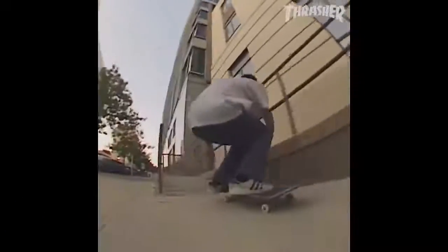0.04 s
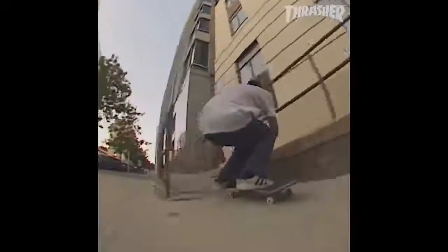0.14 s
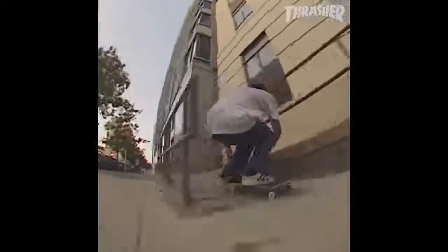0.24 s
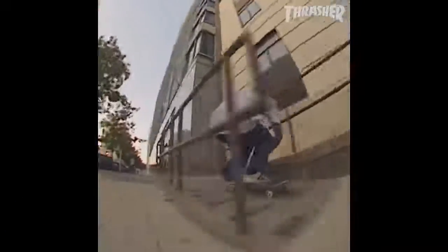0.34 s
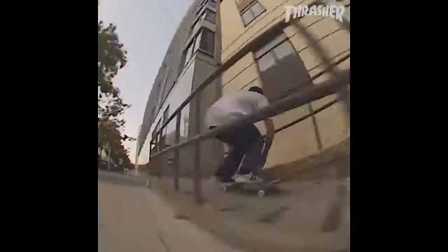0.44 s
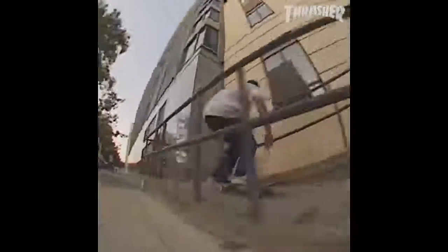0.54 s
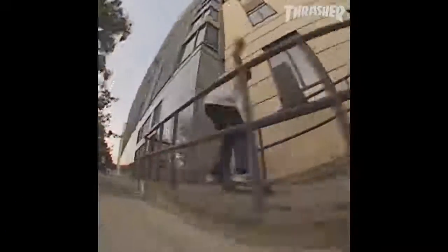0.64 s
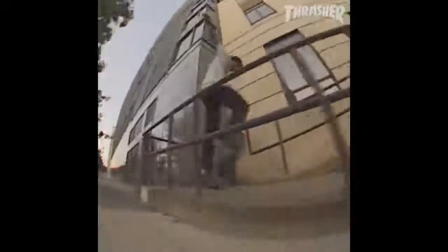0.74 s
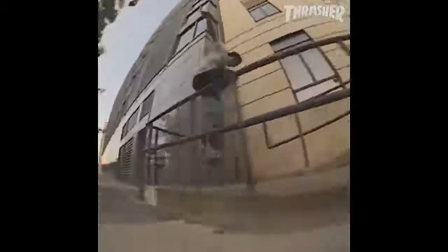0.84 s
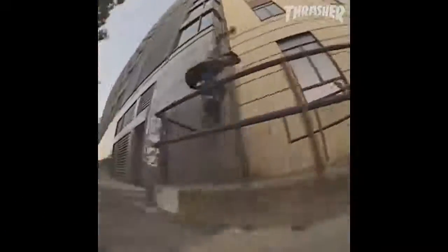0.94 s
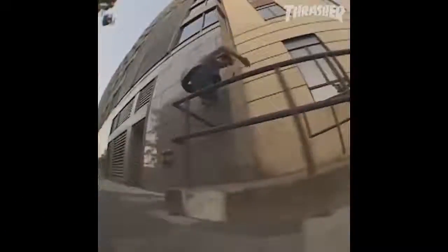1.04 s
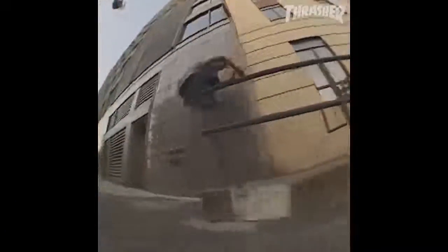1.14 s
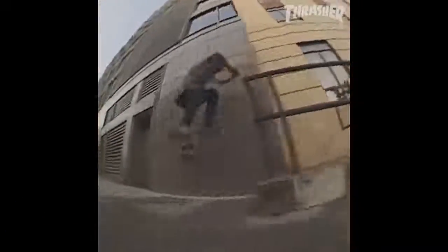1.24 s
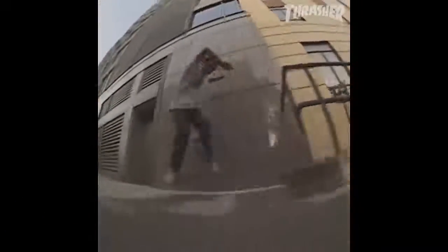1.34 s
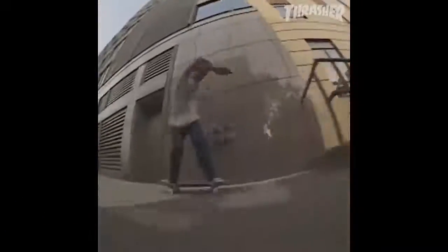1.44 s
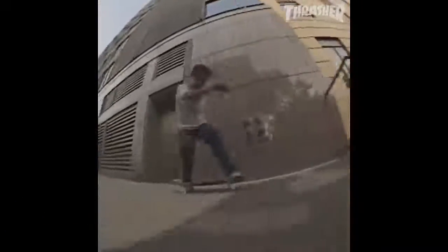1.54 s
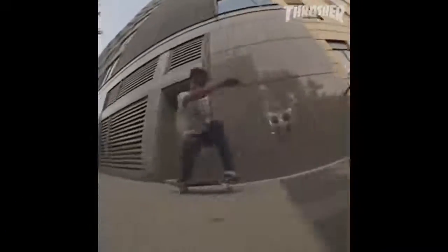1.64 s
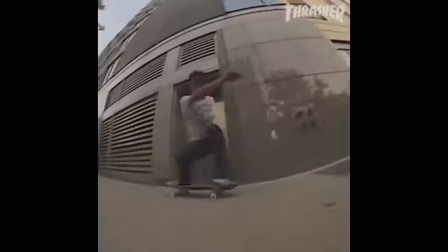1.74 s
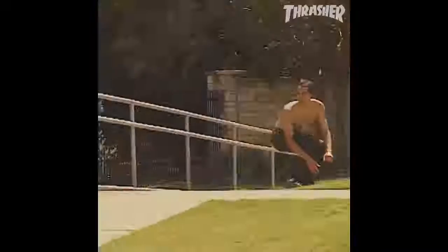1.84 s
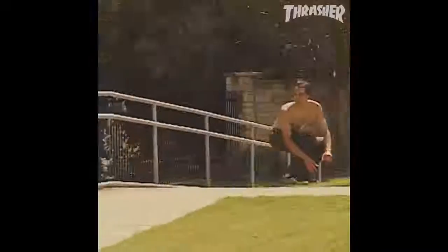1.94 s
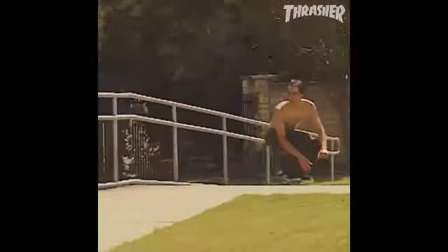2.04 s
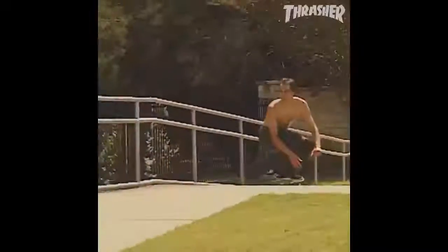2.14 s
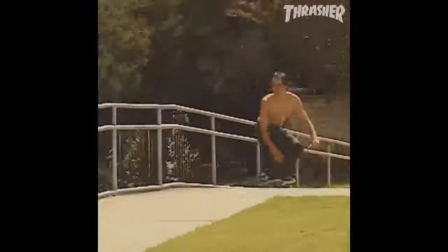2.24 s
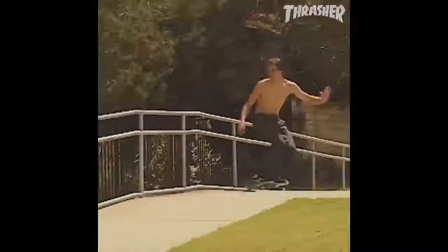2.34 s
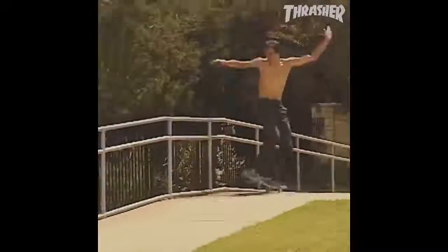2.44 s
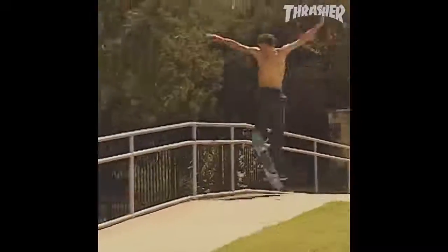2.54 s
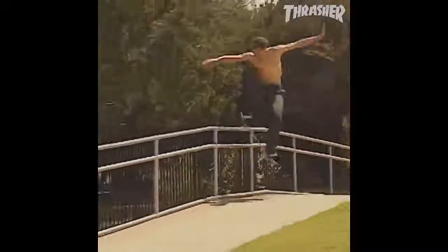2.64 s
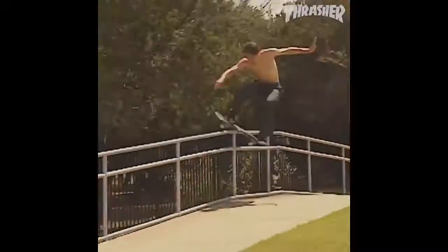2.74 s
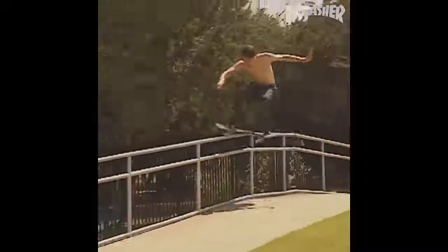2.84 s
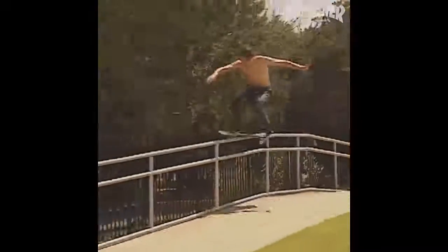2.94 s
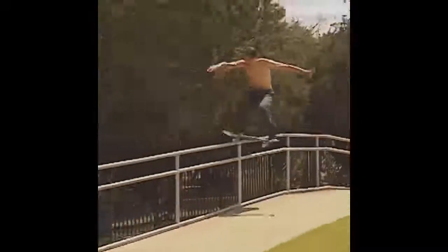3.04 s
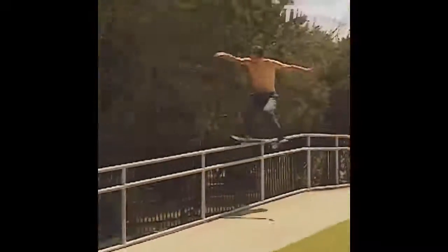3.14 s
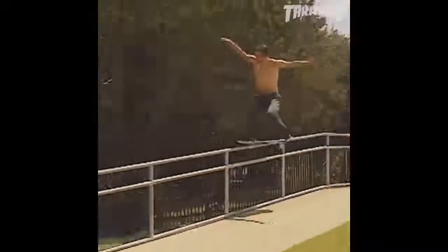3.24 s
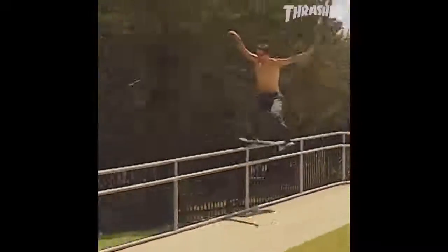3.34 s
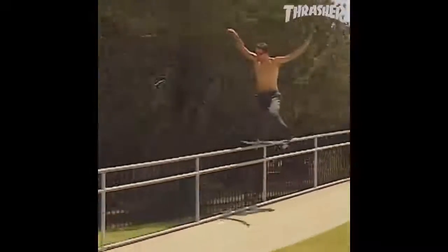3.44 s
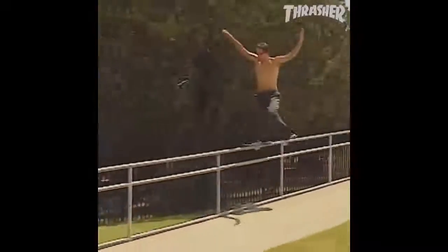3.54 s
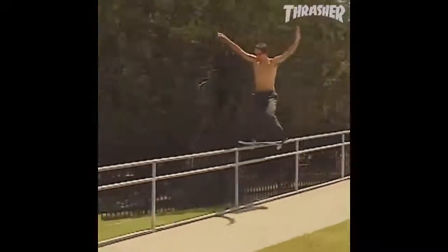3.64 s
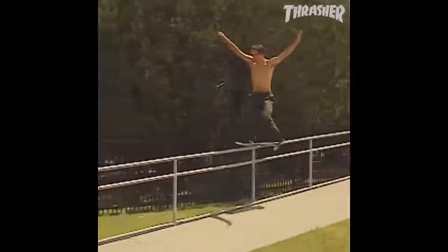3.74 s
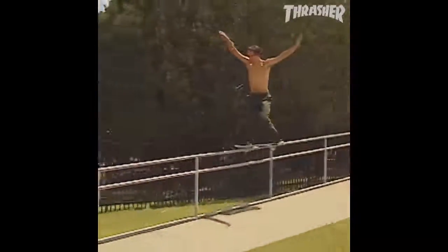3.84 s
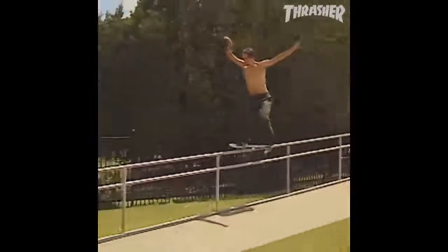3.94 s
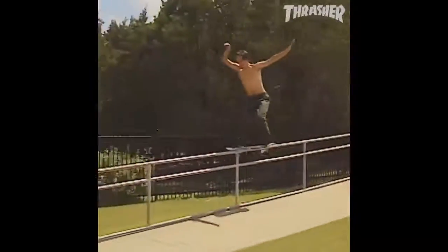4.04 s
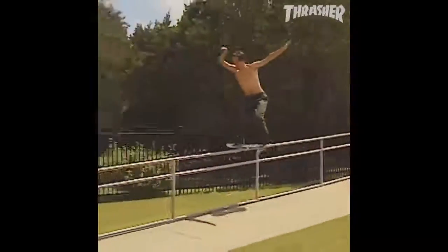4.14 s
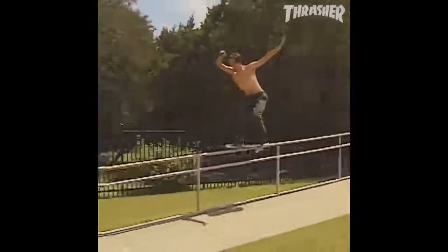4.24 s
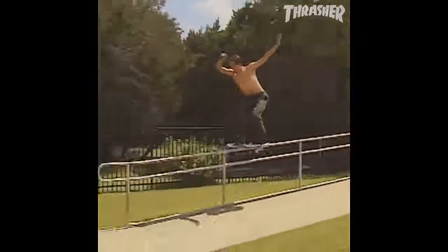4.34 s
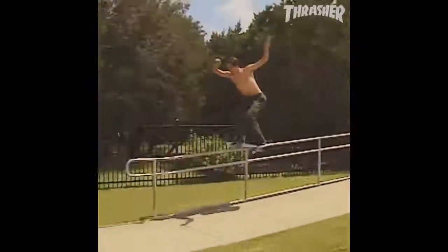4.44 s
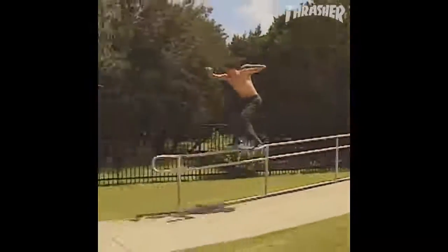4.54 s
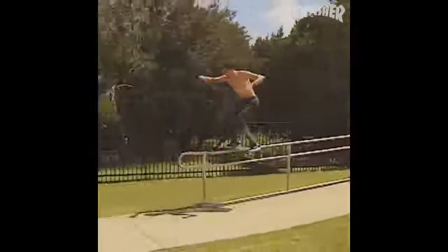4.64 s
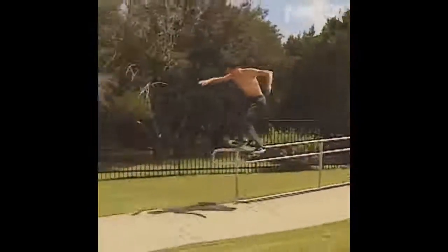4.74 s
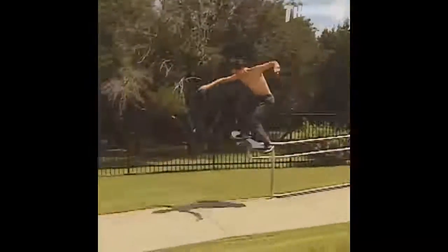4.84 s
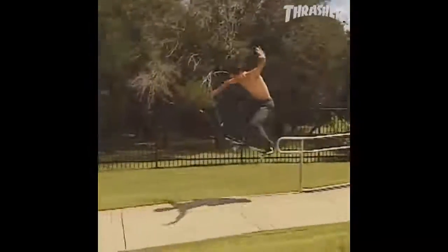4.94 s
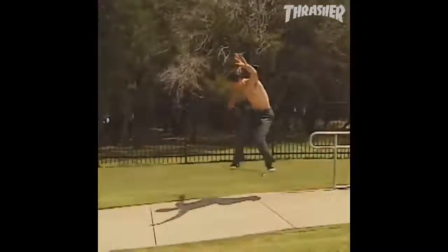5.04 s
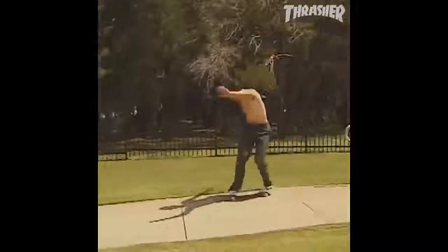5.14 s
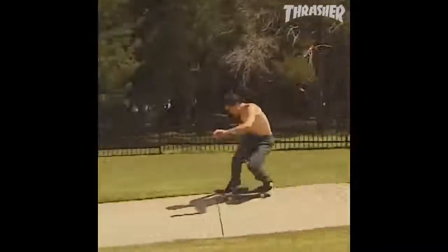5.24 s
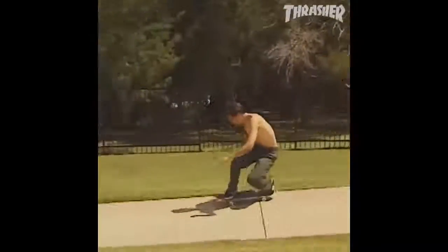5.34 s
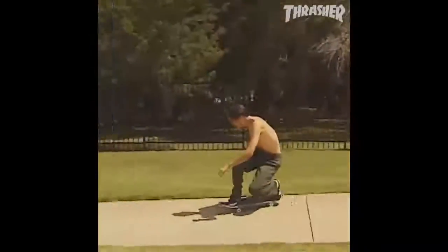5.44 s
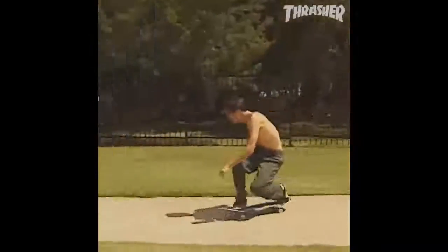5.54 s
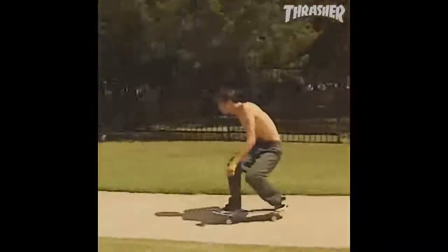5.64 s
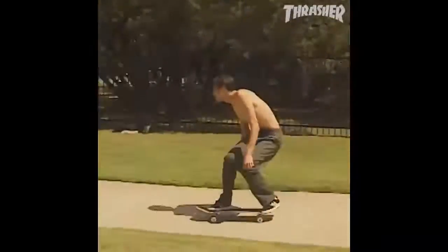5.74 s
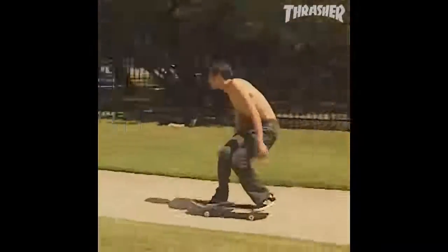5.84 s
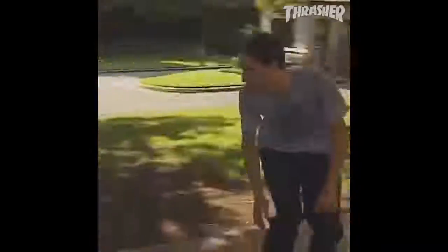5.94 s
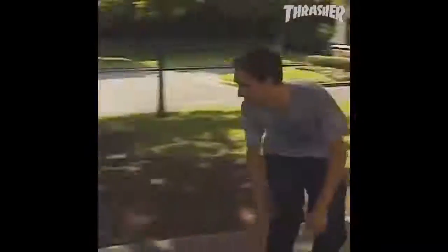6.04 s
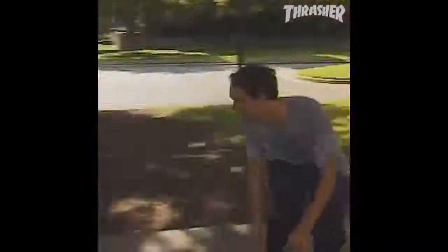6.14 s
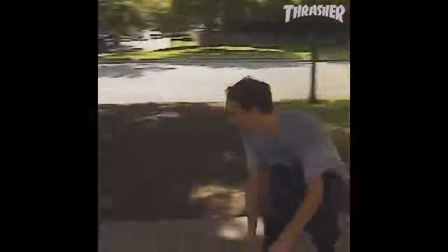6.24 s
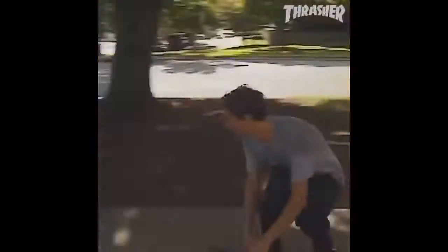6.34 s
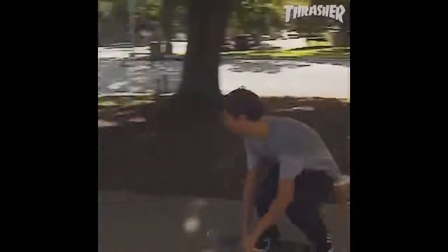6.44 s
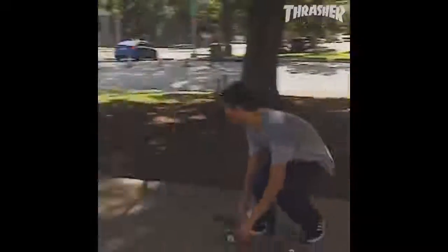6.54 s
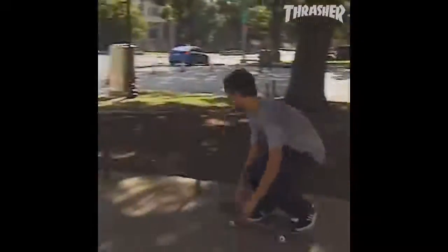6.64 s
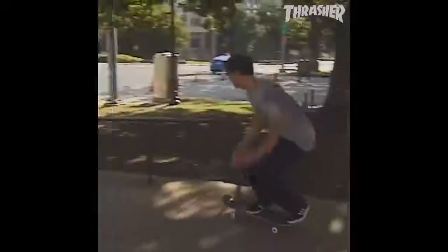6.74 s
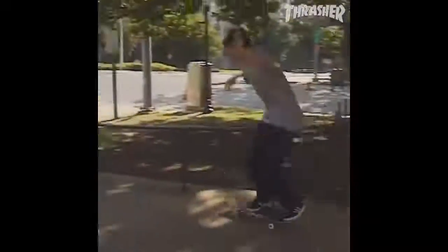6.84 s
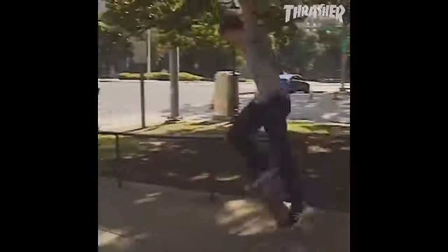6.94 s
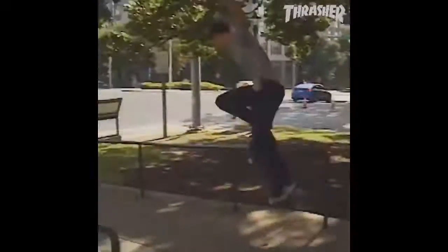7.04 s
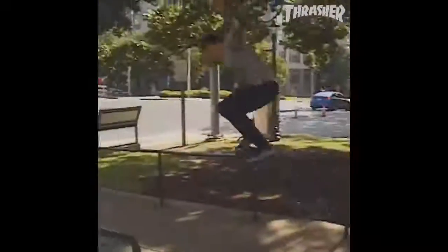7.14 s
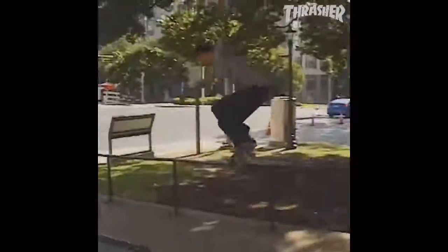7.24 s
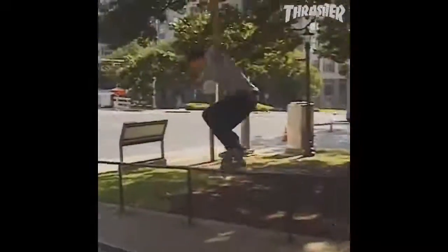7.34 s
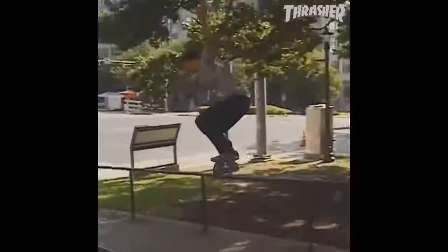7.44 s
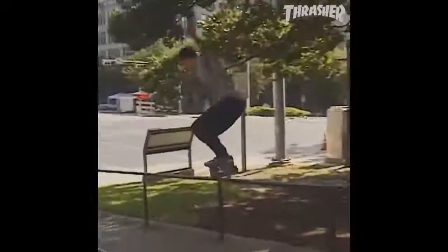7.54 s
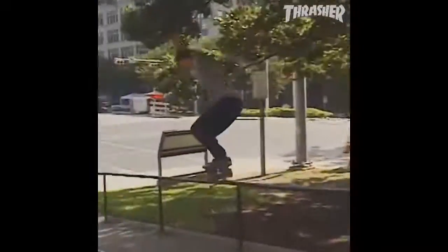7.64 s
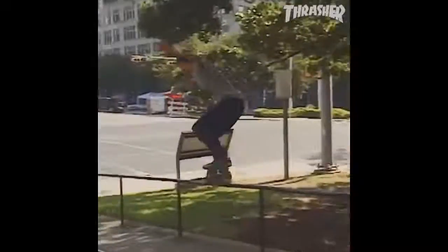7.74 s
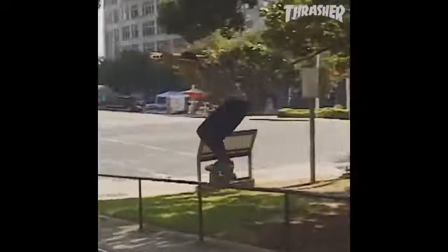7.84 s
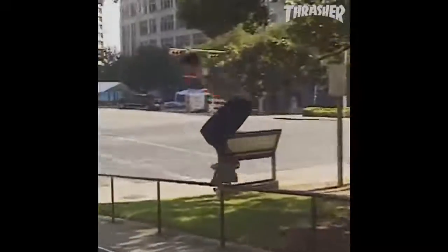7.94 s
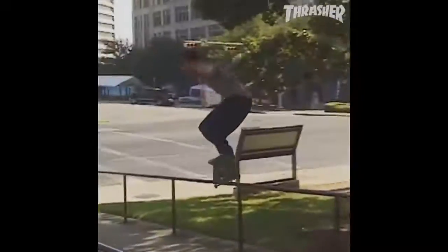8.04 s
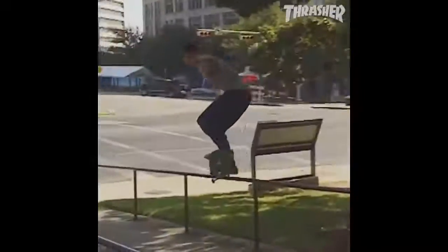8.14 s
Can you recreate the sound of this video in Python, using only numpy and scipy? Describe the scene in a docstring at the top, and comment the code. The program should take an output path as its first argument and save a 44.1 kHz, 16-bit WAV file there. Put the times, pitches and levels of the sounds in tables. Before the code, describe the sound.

A skateboard rolls over rough pavement, pops, hums dully along a wall and lands with a hard slap. A second rolls up a path with paired knocks, snaps, slides softly along a long metal rail among windy rumbles, and slams down. A third roars past close, pops and grinds steel until the end. Short street echo; the middle is stereo, the outer parts mono.

```python
"""Wheels roar over paving and knock across joints, tails snap and boards land hard in three skateboard tricks outdoors.
One board slides softly down a long handrail, the last grinds a ringing steel rail; air buffets the microphone.
Rolling and scraping are random grains that excite a resonant body; blows are short chatters of such grains.
Wind and open air are coloured noise, street echoes are sparse reflections, and the hardest blows overload the input."""
import sys
import numpy as np
from scipy import signal
from scipy.io import wavfile
from scipy.ndimage import map_coordinates

SR = 44100
rng = np.random.default_rng(int(sys.argv[2]) if len(sys.argv) > 2 else 0)


def transcribe(signal):
    """Save signal, clipped to [-1, 1], as a 16-bit WAV file at the path in sys.argv[1]."""
    frames = np.atleast_2d(signal).T
    limited = np.clip(frames, -1, 1)
    pcm = np.round(limited * 32767).astype(np.int16)
    wavfile.write(sys.argv[1], SR, pcm)


N = 361179
TIME = np.arange(N) / SR

# rides over the path: on_s, off_s, roar_db, hiss_db, roar_trend_db_per_s, hiss_trend_db_per_s,
# surge_db (at touchdown), release_t60_s
PATH_RIDE = (5.11, 6, -31, -36.5, 6.5, 0.5, -2, 0.12)
PARK_RIDE = (5.86, 6.925, -16.2, -35.3, -10, -3.3, -2.5, 0.44)
# colour of a wheel knock: pitch_hz, level_db (relative, per hertz)
KNOCK_COLOUR = [(60, -26.5), (200, -3), (680, 3), (1270, -17.5), (2120, -23), (3320, -18.5), (4250, -26.5),
                (12800, -35)]
# resonances of wheels, trucks and handrail: pitch_hz, half_width_hz, level_db (relative)
WHEEL_MODES = [(325, 49, -7), (610, 40, -10), (1151, 200, -13)]
TRUCK_MODES = [(600, 40, 15), (1500, 40, 3)]
HANDRAIL_MODES = [(1430, 70, 5), (1820, 55, -1), (2580, 60, 0), (3000, 90, 1), (3840, 60, -3),
                  (5950, 150, -10)]


def rolling():
    """Rolling noise: surface roughness excites hard wheels, coloured by each kind of paving."""
    # unbroken rides: on_s, off_s, roar_db, hiss_db, roar_trend_db_per_s, hiss_trend_db_per_s,
    # surge_db, release_t60_s
    sidewalk_ride = (0.0, 0.3185, -19.5, -36, -25.5, 4.5, 1.5, 0.1868)
    concrete_ride = (0.31, 1.385, -36.8, -44.3, 1, 3.5, 4, 0.03)
    roll_away_ride = (1.39, 1.815, -28.5, -40, 1, 0, 0, 0.03)
    ramp_ride = (1.82, 2.5, -32.5, -53, -0.5, 10, -2.5, 0.3051)
    # colour of each surface: pitch_hz, level_db (relative, per hertz)
    sidewalk_colour = [(90, -6), (180, -13), (450, -0.5), (950, -2.5), (1460, -12), (3480, -17.5),
                       (4450, -28), (7400, -24.5), (12800, -30.5)]
    concrete_colour = [(100, 0), (400, -1), (800, 0), (950, -4), (1300, -3), (1570, 3.5), (1950, -4),
                       (3300, -13), (4400, -24), (7300, -27), (10000, -24), (12800, -35)]
    roll_away_colour = [(130, 3), (440, -1), (620, 1), (950, -6), (1300, -3), (2000, -10), (3400, -14),
                        (4300, -23), (9000, -24), (12800, -34)]
    ramp_colour = [(100, -15), (480, -4), (1300, -19.5), (1820, -32), (12800, -44.5)]
    path_colour = [(80, -4), (200, 1), (330, 5), (450, 3), (650, 6.5), (860, -2.5), (1150, -1.5),
                   (1930, -22.5), (5000, -29.5), (9500, -29.5), (12800, -42)]

    sidewalk = contact(sidewalk_ride, body(sidewalk_colour, WHEEL_MODES, -3), 4000, 1.4, 1.1, 1.8, burr_db=-6)
    concrete = contact(concrete_ride, body(concrete_colour, TRUCK_MODES, -9), 8000, 2, 1.2, 1.5, burr_db=-13)
    roll_away = contact(roll_away_ride, body(roll_away_colour), 6000, 2, 1.3, 2.5, burr_db=-10)
    ramp = contact(ramp_ride, body(ramp_colour), 5000, 1.56, 1.16, 2.5, burr_db=-12)
    path = sum(contact(run, body(path_colour, WHEEL_MODES, 0), 2200, 2.3, 1.3, 1.8, burr_db=-8)
               for run in (PATH_RIDE, PARK_RIDE))
    return sidewalk + concrete + roll_away + ramp + path


def rails():
    """Friction excitation: a dry scrape along the handrail, then a metal truck that makes a steel tube sing."""
    # the two rides: on_s, off_s, roar_db, hiss_db, roar_trend_db_per_s, hiss_trend_db_per_s,
    # surge_db, release_t60_s
    slide_ride = (2.73, 4.818, -50.8, -53, 2.6, 3.6, 9, 0.12)
    grind_ride = (7.14, 9, -29.5, -32, -8.5, -5, 7, 0.03)
    # colour of each scrape: pitch_hz, level_db (relative, per hertz)
    slide_colour = [(210, -3), (450, -4), (650, -10), (1700, -13), (3700, -7.5), (4600, -15), (6000, -14),
                    (8600, -17.5), (12800, -35)]
    grind_colour = [(120, -8), (400, -8), (620, -2), (1030, 3.5), (1530, -1), (2900, -10), (3400, -7),
                    (4400, -13), (5300, -21), (6400, -10), (9000, -11), (10200, -22), (12800, -32)]

    scrape = contact(slide_ride, body(slide_colour, HANDRAIL_MODES, -17), 1500, 1.5, 2.3, 3.2,
                     burr_db=-6, width_hz=260, life_s=0.045)
    grinding = contact(grind_ride, body(grind_colour, rail_modes(), 3.8), 2000, 1.6, 1.5, 3.3,
                       burr_db=-7, width_hz=55, life_s=0.07)
    return scrape + grinding


def rail_modes():
    """Modal damping: all modes of the steel tube share one width, so they die at about the same rate."""
    # modes of the steel tube: pitch_hz, level_db (relative)
    tube_modes = [(1040, 1), (1305, -5), (1820, -6), (2073, -8), (2444, -7), (3170, -6), (3408, -5),
                  (4274, -8.5), (6363, -11), (6643, -10), (7140, -8), (7515, -7), (8150, -6)]
    half_width_hz = 42
    return [(hz, half_width_hz, db) for hz, db in tube_modes]


def impacts():
    """Impact excitation: joints knock wheels, snaps crack the maple deck, trucks ring rails, landings slam."""
    # blow tables below: start_s, chatter_s, level_db (before weighting by chatter length),
    # thump_db and crack_db (both re level)
    # short wheel bumps, a rattle after the first landing, and a wheel touching before the grind
    bumps = [(0.1895, 0.002, -4.5, -3, -21), (0.252, 0.0062, -18.5, -4.5, -20),
             (1.429, 0.045, -19, -9.5, -16), (1.515, 0.0133, -30, 10, -10), (1.62, 0.015, -27, 3, -9),
             (1.694, 0.011, -9, -6, -14), (5.535, 0.014, -25, 3, -12), (5.61, 0.005, -26, 11, -5.5),
             (5.906, 0.0061, -9.5, -6, -14.5), (6.001, 0.005, -16, 0, -11), (7.116, 0.0269, -19, -4, -11)]
    # wheels knocking on the wall make the trucks hum
    wall_touches = [(1.064, 0.06, -26, -6, -15), (1.203, 0.022, -21.5, -3, -16),
                    (1.305, 0.03, -24.5, 1, -14)]
    # tail snapping on the ground, deck clattering, shoe catching it
    clacks = [(0.7475, 0.00535, -9.5, -31, 5), (2.483, 0.0033, -12, -10, 4.5),
              (2.49, 0.008, -24, -11.5, 6.5), (6.916, 0.0038, -9.5, -7, 4.5), (7.028, 0.0033, -33, -6.5, 2)]
    # the board clanking on the long handrail
    handrail_knocks = [(2.712, 0.011, -30, -10, -6), (2.7272, 0.0036, -12, -8, 2),
                       (3.818, 0.0073, -35, -7.5, -4), (4.447, 0.0144, -33, -10, -11),
                       (4.712, 0.005, -20.5, -12, 1), (4.772, 0.0063, -23, -7, 0)]
    # the metal truck striking the steel rail
    strikes = [(7.145, 0.015, -11, -23.5, 1), (7.167, 0.00377, -9.5, -20, 4.5),
               (8.013, 0.014, -16.5, -15, -10)]
    # board and rider coming down
    landings = [(1.380, 0.026, -0.5, -8, -3.5), (5.0915, 0.013, 1.5, -9, 0)]
    # colour of snaps and of landings: pitch_hz, level_db (relative, per hertz)
    clack_colour = [(100, -3), (1050, 2), (3210, -1), (5670, -18), (7240, -17.5), (12800, -28)]
    landing_colour = [(60, -24.5), (110, 7), (480, 4.5), (1480, -4), (2100, -9), (3320, -13),
                      (12800, -33.5)]
    # resonances of the free and the loaded deck: pitch_hz, half_width_hz, level_db (relative)
    deck_modes = [(1875, 78.5, 6), (2760, 49, -7), (3344, 64, 0), (3730, 77, -3.5)]
    loaded_deck_modes = [(630, 80, 9), (1010, 75, 6), (1480, 90, 2), (3330, 280, -11)]

    wheel = body(KNOCK_COLOUR, WHEEL_MODES, 7.9)
    trucks = body(KNOCK_COLOUR, TRUCK_MODES)
    deck = body(clack_colour, deck_modes, 2.5)
    handrail = body(landing_colour, HANDRAIL_MODES, -1.5)
    steel_rail = body(clack_colour, rail_modes(), 2.7)
    loaded_deck = body(landing_colour, loaded_deck_modes)
    return (blows(axle_knocks(), wheel, 0.003, -19, 0.022, rise=0.4)
            + blows(bumps, wheel, 0.0035, -20, 0.019, rise=0.13)
            + blows(wall_touches, trucks, 0.008, -25, 0.02, rise=0.13)
            + blows(clacks, deck, 0.00217, -20, 0.033, rise=0.13)
            + blows(handrail_knocks, handrail, 0.0015, -19.5, 0.075, rise=0.13)
            + blows(strikes, steel_rail, 0.0012, -17, 0.0256, rise=0.13)
            + blows(landings, loaded_deck, 0.0045, -31, 0.065, rise=0.12))


def axle_knocks():
    """Travel delay: every joint knocks twice, the rear axle later by wheelbase over speed."""
    # paving joints under the front wheels: start_s, speed_m_per_s, level_db (before weighting by
    # chatter length), rear_db (re front), thump_db and crack_db (both re level)
    joints = [(0.186, 3.85, -14, -1, -2, -14), (1.868, 5.0, -22.5, 6, -2, -15),
              (2.129, 5.0, -19.8, 2.5, 1.5, -14.5), (2.395, 4.3, -25, 3.5, 3, -7),
              (5.255, 4.56, -12, 6, -4, -8.5), (5.513, 4.6, -22, 5.5, 1, -6),
              (5.733, 4.6, -13, 0, -4, -9.5), (6.084, 3.45, -3.5, -0.5, -4.5, -15),
              (6.466, 3.45, -5.5, -4.5, -7.5, -14.5)]
    wheelbase_m, chatter_s = 0.36, 0.015
    return [(s + axle * wheelbase_m / speed, chatter_s, db + axle * rear, thump, crack)
            for s, speed, db, rear, thump, crack in joints for axle in (0, 1)]


def pebbles():
    """Sparse impact noise: loose grains on the path tick under the wheels, harder as the roar grows."""
    out, response = np.zeros(N), body(KNOCK_COLOUR)
    for run in (PATH_RIDE, PARK_RIDE):
        t, roar, _ = ride(run)
        grains = grit(len(t), per_s=80, spread_db=2.0)
        ticks = signal.oaconvolve(grains, response)[:len(t)]
        add(out, t[0], unit(band(ticks, 1100, 2700, order=2)) * amp(roar - 19))
    return out


def wall():
    """Low-frequency resonance: wheels riding on the wall set it booming in uneven lumps."""
    # the ride on the wall: on_s, off_s, level_db
    wall_ride = (1.0985, 1.385, -36)
    # the boom swells as the rider pushes off: centre_s, half_width_s, level_db (added)
    push_off = (1.343, 0.04, 17)
    on, off, db = wall_ride
    push_s, width, push_db = push_off
    boom = unit(band(rng.standard_normal(N), 82, 126, order=3)) * amp(3.33 * wander(N, 24.7))
    riding = np.interp(TIME, [on - .05, on, off, off + .05], [0, 1, 1, 0])
    return boom * riding * amp(db + push_db * bell(TIME, push_s, width))


def contact(run, response, per_s, spread_db, flutter_db, drift_db, burr_db, width_hz=200, life_s=0.06):
    """Roughness excitation: grains under a wheel or truck shake the board while the load flutters."""
    t, roar, hiss = ride(run)
    drive = grit(len(t), per_s, spread_db) * amp(flutter_db * wander(len(t), 90))
    drive = drift(drive, drift_db, width_hz, life_s)
    # pebbles and burrs tick on their own, mostly in the treble
    burrs = amp(burr_db) * grit(len(t), per_s=70, spread_db=2.2)
    shaken, ticks = (signal.oaconvolve(x, response)[:len(t)] for x in (drive, burrs))
    low = unit(band(shaken + 0.55 * ticks, 64.2, 1567, order=4)) * amp(roar)
    high = unit(band(shaken + ticks, 2020, 19500, order=4)) * amp(hiss)
    fade_in = np.clip((t - t[0]) / .002, 0, 1)
    fade_out = np.clip((t[-1] - t) / .012, 0, 1)
    out = np.zeros(N)
    add(out, t[0], (low + high) * fade_in * fade_out)
    return out


def ride(run):
    """Contact load sets level: times, roar and hiss in dB from a surge, a trend, shifts of weight and a release."""
    # the rider's weight bears down on the board or lifts off it:
    # centre_s, half_width_s, roar_db (added), hiss_db (added)
    leans = [(1.69, 0.08, 6.5, 3), (2.47, 0.067, 1.5, 7), (5.45, 0.0863, -7, -6.5), (6.55, 0.1, 2, 0.5),
             (6.88, 0.1, -2.5, 2), (2.83, 0.08, 9, 3), (3.0, 0.116, -1, -5), (3.21, 0.038, 5, 7),
             (3.85, 0.035, 7.5, 8), (4.0, 0.0235, 6, 11), (4.205, 0.03, 2.5, 5), (4.1, 0.059, 9, 6.5),
             (4.21, 0.03, 3.5, 4), (4.5, 0.05, -1, 6), (4.75, 0.15, 5, 8.5), (7.57, 0.0746, 6, 7.5),
             (7.76, 0.051, -6, -6.5), (7.875, 0.0366, 6.5, 8), (8.06, 0.051, 7, -3.5),
             (8.141, 0.0437, 12.5, 6)]
    settle_s = 0.1178  # the surge dies away as the knees absorb a touchdown
    on, off, roar, hiss, roar_trend, hiss_trend, surge, release = run
    t = np.arange(max(on, 0), off + release / 2, 1 / SR)
    load = surge * np.exp(-(t - on) / settle_s) - 60 * np.maximum(t - off, 0) / release
    roar = roar + roar_trend * (t - on) + load
    hiss = hiss + hiss_trend * (t - on) + load
    for s, width, more_roar, more_hiss in leans:
        if on < s < off:
            lean = bell(t, s, width)
            roar, hiss = roar + more_roar * lean, hiss + more_hiss * lean
    return t, roar, hiss


def drift(x, depth_db, width_hz, life_s):
    """Time-varying response: resonances swell and shift as the contact point and the rider's weight move."""
    hz, t, spectrum = signal.stft(x, SR, nperseg=1024, noverlap=768)
    where = np.meshgrid(hz / max(width_hz, 40), t / max(life_s, .02), indexing="ij")
    patches = map_coordinates(rng.standard_normal((600, 130)), where, order=1, mode="nearest")
    shaped = spectrum * amp(depth_db * unit(patches))
    return signal.istft(shaped, SR, nperseg=1024, noverlap=768)[1][:len(x)]


def blows(rows, response, settle_s, rattle_db, rattle_s, rise):
    """Impulsive forcing: each blow is a short chatter of contacts; then the loose hardware rattles itself out."""
    out, t = np.zeros(N), np.arange(SR // 3) / SR
    for s, length, db, thump, crack in rows:
        length = max(length, .001)
        onset = np.minimum(t / (rise * length), 1)
        force = onset * np.exp(-np.maximum(t - 0.699 * length, 0) / settle_s)
        force += amp(rattle_db) * np.exp(-t / rattle_s)
        ring = signal.fftconvolve(grit(len(t), 9000, 2.316) * force, response)[:len(t)]
        low = amp(thump) * unit(band(ring, 75, 365, order=2))
        middle = unit(band(ring, 328.2, 1700, order=2))
        high = amp(crack) * unit(band(ring, 1760, 22400))
        # a longer chatter carries more energy
        add(out, s, (low + middle + high) * amp(db) * np.sqrt(length / t[-1]))
    return out


def grit(size, per_s, spread_db):
    """Random impulse train: tiny impacts of uneven size and either sign, scaled to rms 1."""
    chance, sign, heft = rng.random(size), rng.standard_normal(size), rng.exponential(1, size)
    return unit((chance < per_s / SR) * np.sign(sign) * amp(spread_db * np.minimum(heft, 4)))


def body(tone, modes=(), modes_db=0):
    """Minimum-phase impulse response to one tap: a broad colour with resonances standing out of it."""
    hz = np.fft.rfftfreq(8192, 1 / SR)
    f, db = np.transpose(tone)
    power = amp(np.interp(np.log(hz + 1), np.log(f + 1), db)) ** 2
    for centre, width, level in modes:
        power = power + amp(level + modes_db) ** 2 / (1 + ((hz - centre) / width) ** 2) ** 2
    log_gain = np.log(np.r_[power, power[-2:0:-1]] + 1e-12) / 2
    # the Hilbert transform of log gain gives the phase of a causal response
    return np.fft.ifft(np.exp(np.conj(signal.hilbert(log_gain)))).real[:len(hz)]


def ports(x, lag):
    """Interaural-style delay: sound reaches one port a fraction of a sample early, which widens the treble."""
    return x + lag * np.gradient(x) * np.array([[1], [-1]])


def verges(x, level_db, t60):
    """Early scattering from railings and shrubs, opposite in sign on the two sides."""
    t = np.arange(SR // 10) / SR
    taps = band(rng.standard_normal(len(t)), 1920, 8600, order=1) * amp(-60 * t / t60)
    scatter = signal.oaconvolve(x, taps / np.linalg.norm(taps))[:N]
    return amp(level_db) * scatter * np.array([[1], [-1]])


def street(x, bass_t60, treble_t60):
    """Reverberation: scattered reflections from walls and ground; only their treble differs between the sides."""
    t = np.arange(SR // 2) / SR
    sparse = rng.random((3, len(t))) < 2500 / SR
    taps = rng.standard_normal((3, len(t))) * sparse * (t > .004)
    bass = band(taps[2], 152, 3980) * amp(-60 * t / bass_t60)
    treble = 0.92 * band(taps[:2], 2800, 10800) * amp(-60 * t / treble_t60)
    tail = bass + treble
    return signal.oaconvolve(x[None], tail / np.linalg.norm(tail[0]), axes=1)[:, :N]


def wind():
    """Turbulent pressure: an eddy pushes on one port as it pulls on the other, more on the right."""
    # colour of the buffeting: pitch_hz, level_db (relative, per hertz)
    wind_colour = [(20, -1.5), (110, 2.5), (220, -4.5), (320, -23.5), (600, -35.5)]
    # gusts of air on the moving microphone: centre_s, half_width_s, level_db (before the side balance)
    gusts = [(1.68, 0.095, -39), (1.94, 0.118, -40), (3.5, 0.444, -40), (4.13, 0.22, -35),
             (4.72, 0.251, -34.5), (7.3, 1.2, -45)]
    noise = signal.oaconvolve(rng.standard_normal((3, N)), body(wind_colour)[None], axes=1)[:, :N]
    eddies = noise[:2] + 0.424 * noise[2] * np.array([[1], [-1]])
    buffets = unit(eddies) * amp([[-.5], [4]])
    breeze = amp(-57.5)  # the air is never quite still
    strength = breeze + sum(amp(db) * bell(TIME, s, width) for s, width, db in gusts)
    return buffets * strength * amp(2.05 * wander(N, 12))


def air():
    """Diffuse ambient noise, partly shared by both sides: a faint distant wash of the street and trees."""
    # colour of the open air: pitch_hz, level_db (relative, per hertz)
    air_colour = [(30, -16.5), (100, -6.5), (400, -19.5), (1860, -26), (12800, -48)]
    noise = signal.oaconvolve(rng.standard_normal((3, N)), body(air_colour)[None], axes=1)[:, :N]
    return amp(-44.5) * unit(noise[2] + 0.74 * noise[:2])


def amp(db):
    """Decibel law: amplitude ratio of a level."""
    return 10 ** (np.asarray(db) / 20)


def unit(x):
    """Normalization to rms 1."""
    return x / np.sqrt(np.mean(x ** 2) + 1e-20)


def add(mix, s, sound):
    """Superposition: adds a sound into the mix from time s, in place."""
    part = mix[round(s * SR):][:len(sound)]
    part += sound[:len(part)]


def band(x, lo, hi, order=3):
    """Band-pass filtering between two frequencies in Hz."""
    return signal.sosfilt(signal.butter(order, [lo, min(hi, .49 * SR)], "band", fs=SR, output="sos"), x)


def wander(size, per_s):
    """Slow random modulation of rms 1: chance values joined by straight lines."""
    knots = rng.standard_normal(int(size / SR * per_s) + 2)
    return unit(np.interp(np.arange(size) / SR * per_s, np.arange(len(knots)), knots))


def bell(t, centre, width):
    """Gaussian envelope: a smooth swell of height 1, down to 1/e at the half-width."""
    return np.exp(-((t - centre) / width) ** 2)


def scene():
    """Superposition of the boards, their reflections, wind and open air."""
    board = rolling() + pebbles() + wall() + rails() + impacts()
    direct = ports(board, lag=0.07)
    early = verges(board, level_db=-23.5, t60=0.051)
    echoes = amp(-25.5) * street(board, bass_t60=0.706, treble_t60=0.236)
    return direct + early + echoes + wind() + air()


def record(dry):
    """Saturation and band limiting: mono outside the stereo stretch, then overload on the hardest blows."""
    # the middle stretch is heard in stereo: start_s, end_s
    stereo_span = (1.82, 5.86)
    stereo = (TIME > stereo_span[0]) & (TIME < stereo_span[1])
    picked_up = np.where(stereo, dry, dry.mean(0))
    clipped = picked_up / (1 + np.abs(picked_up) ** 5) ** (1 / 5)
    low_pass = signal.firwin(511, 13000, window=("kaiser", 8), fs=SR)  # cutoff in Hz
    return signal.oaconvolve(clipped, low_pass[None], "same")


dry = scene()
out = record(dry)
transcribe(out)
```